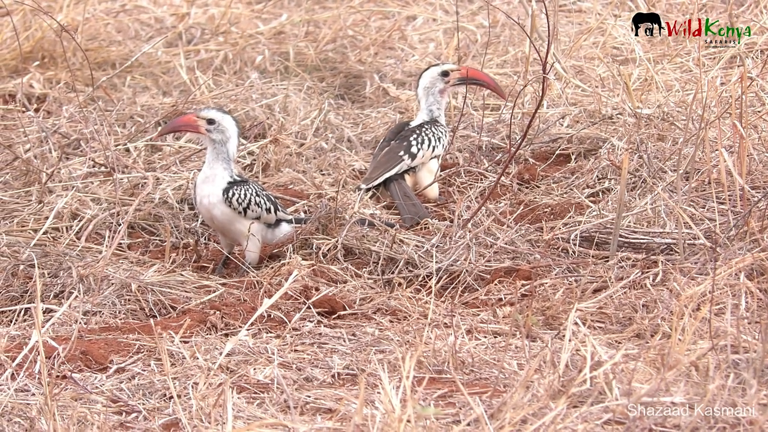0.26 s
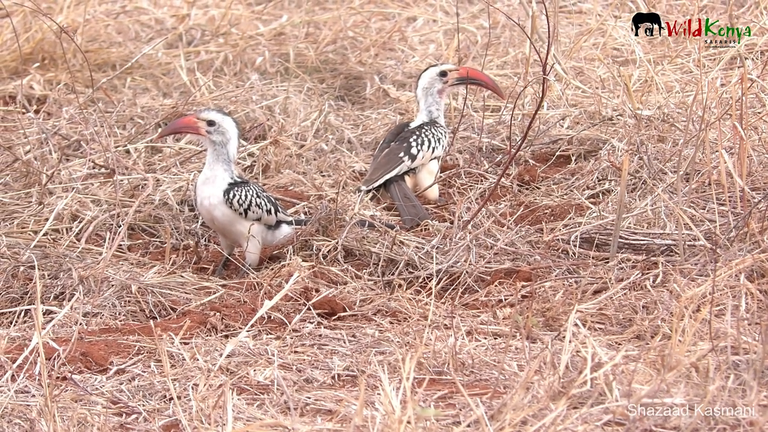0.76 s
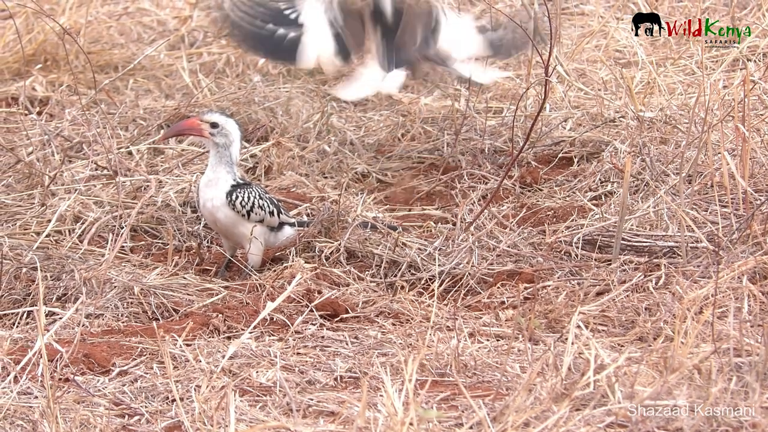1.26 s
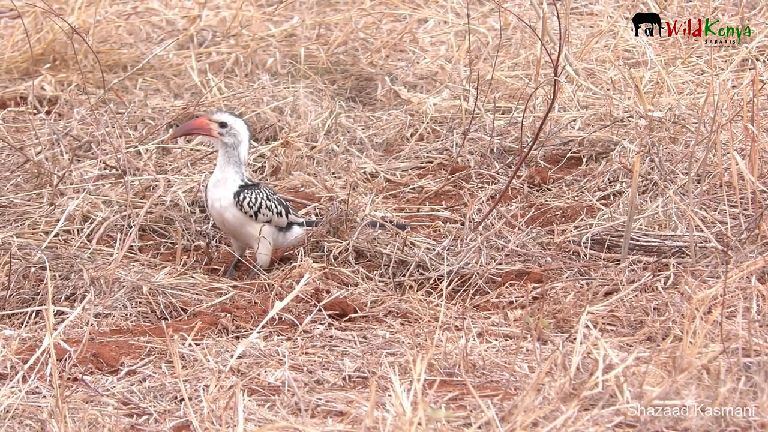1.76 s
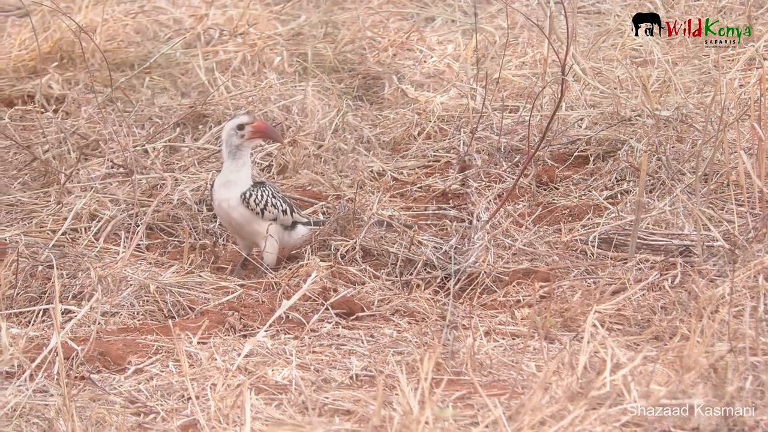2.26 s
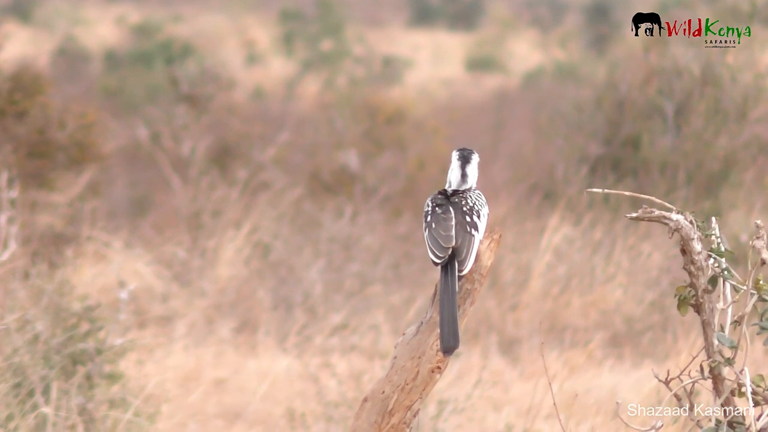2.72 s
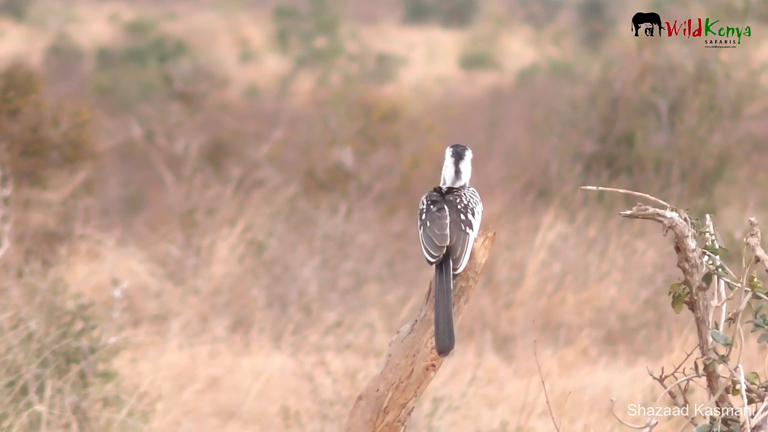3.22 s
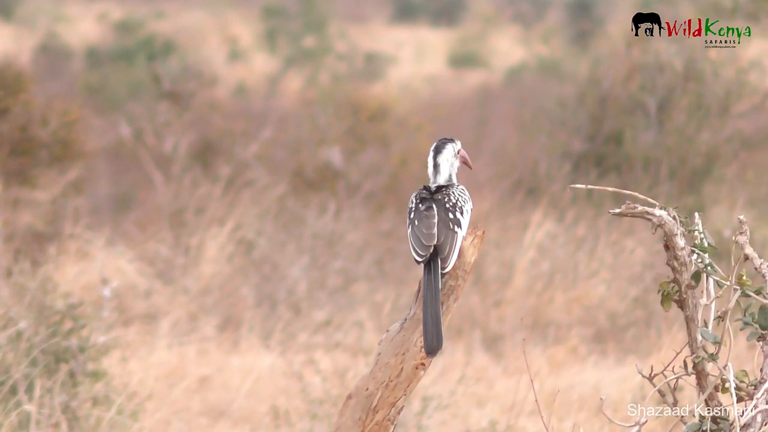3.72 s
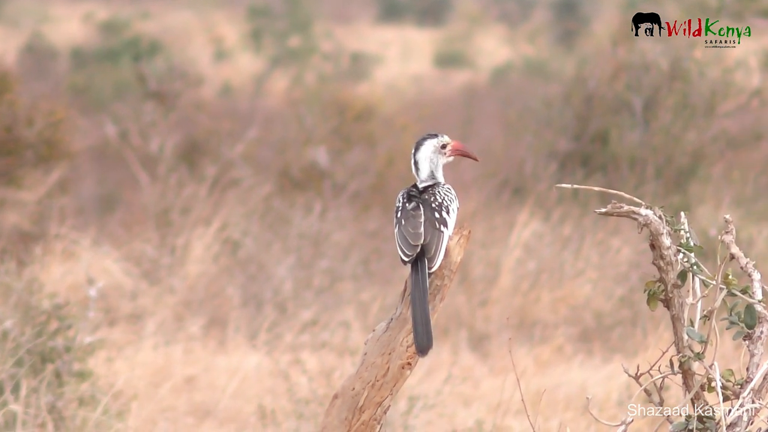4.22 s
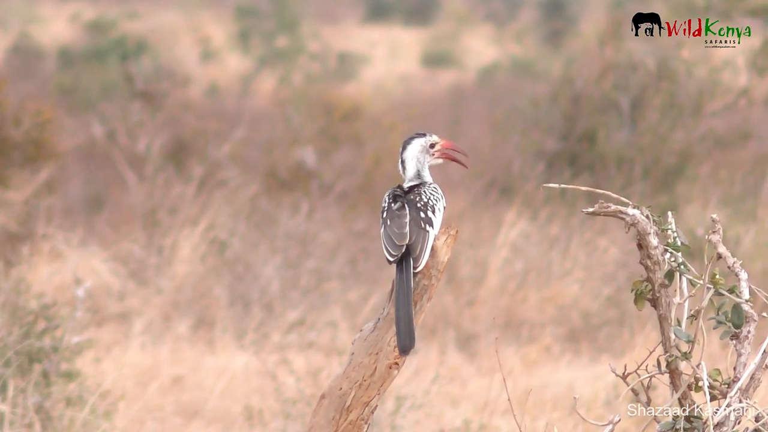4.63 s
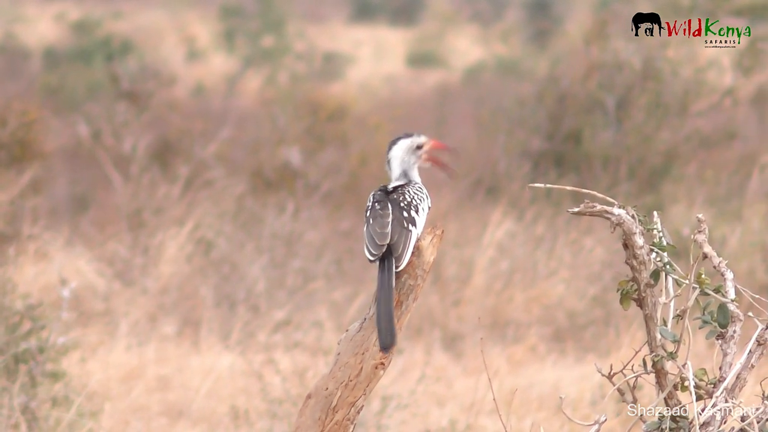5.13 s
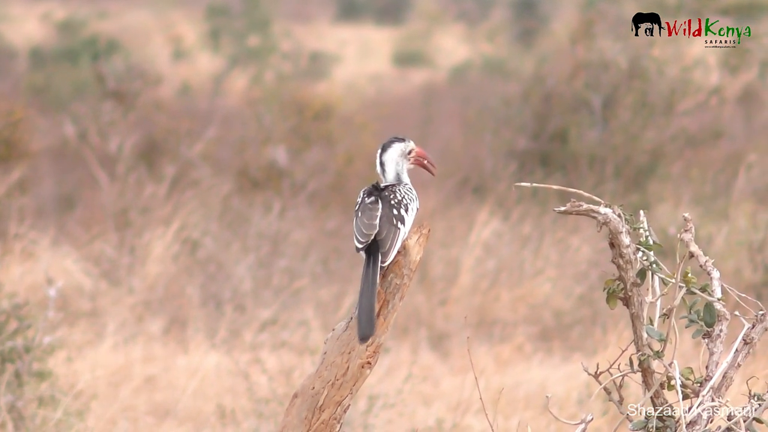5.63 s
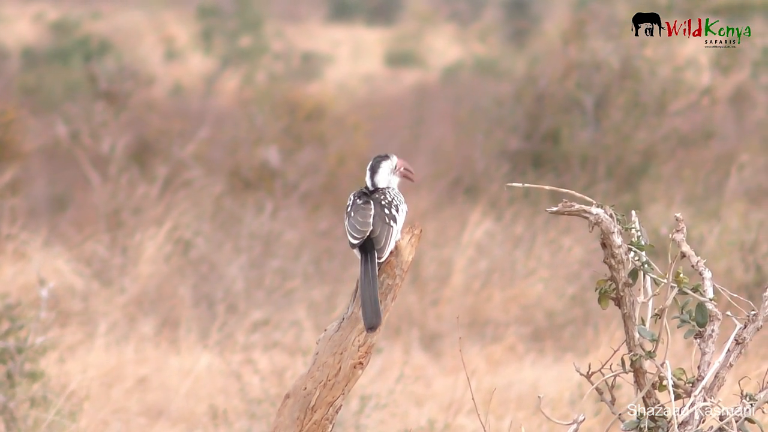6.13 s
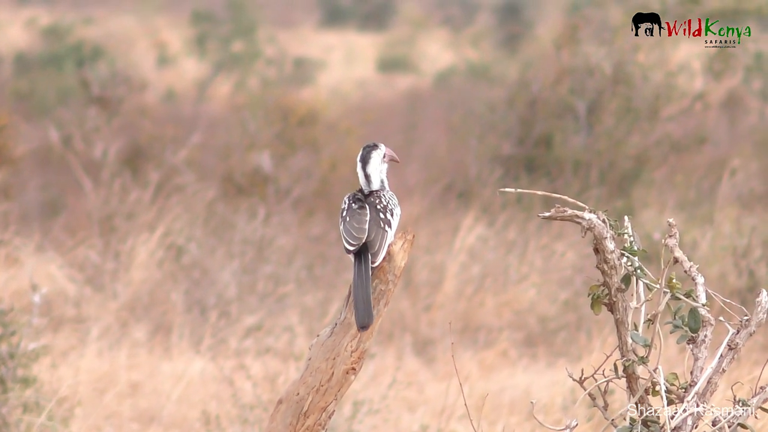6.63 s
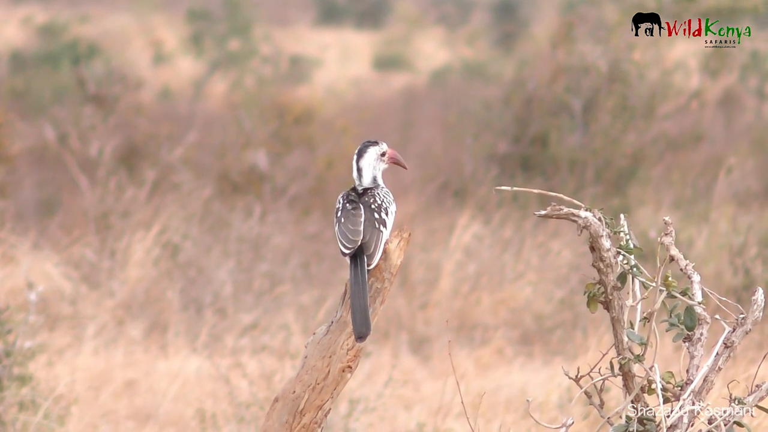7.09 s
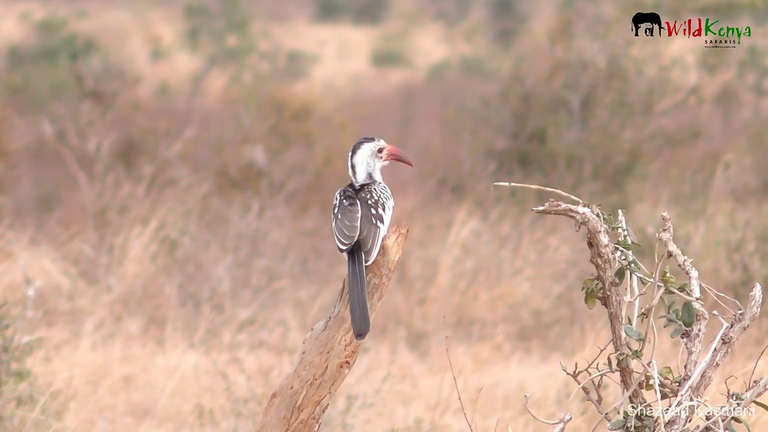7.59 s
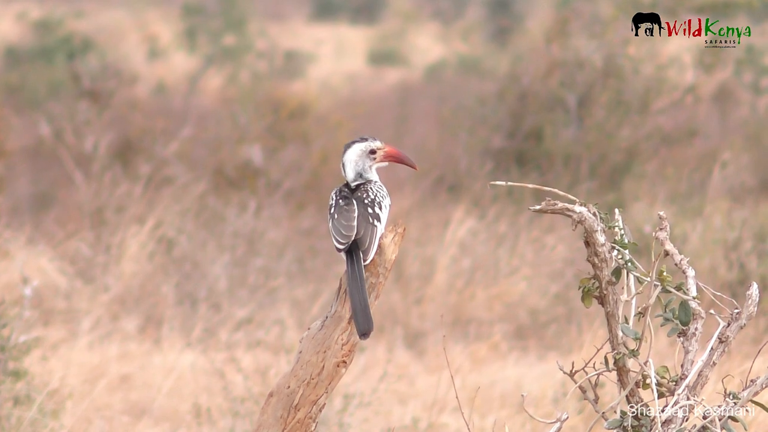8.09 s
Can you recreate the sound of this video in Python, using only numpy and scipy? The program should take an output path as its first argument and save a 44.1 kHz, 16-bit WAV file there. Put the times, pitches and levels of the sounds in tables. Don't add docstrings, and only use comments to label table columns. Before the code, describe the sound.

A nearby bird's rapid squawking, trilled and whistled chatter breaks off abruptly in windy dry bush; faint far birds chirp on over low rumble.

```python
import sys
import numpy as np
from scipy import signal
from scipy.fft import rfft, irfft, next_fast_len
from scipy.io import wavfile
from scipy.ndimage import uniform_filter1d

SR = 44100
rng = np.random.default_rng(int(sys.argv[2]) if len(sys.argv) > 2 else 0)


def waveform_to_disk(signal):
    frames = np.transpose(np.atleast_2d(signal))
    scaled = np.clip(frames, -1, 1) * 32767
    samples = np.round(scaled).astype(np.int16)
    wavfile.write(sys.argv[1], SR, samples)


def linear_from_db(decibels):
    return 10 ** (np.asarray(decibels, float) / 20)


N = 368468

WHISTLE_OVERTONES_DB = -16


def along(table, column, t):
    rows = np.array(table)
    return np.interp(t, rows[:, 0], rows[:, column])


def walk(rate, size=N):
    k = int(SR / rate)
    w = np.repeat(rng.standard_normal(size // k + 1), k)
    w = uniform_filter1d(uniform_filter1d(w, k), k)[:size]
    return w / w.std()


def band(shape, lo_hz, hi_hz):
    size = next_fast_len(N)
    points = np.array(shape)
    octave = np.log2(np.fft.rfftfreq(size, 1 / SR) + 1)
    edge = np.clip(np.minimum(octave - np.log2(lo_hz), np.log2(hi_hz) - octave) + .5, 0, 1)
    colour = linear_from_db(np.interp(octave, np.log2(points[:, 0]), points[:, 1]))
    return irfft(rfft(rng.standard_normal(size)) * colour * np.sin(edge * np.pi / 2), size)[:N]


def add(out, start_s, sound, fade_s):
    i, k = int(start_s * SR), np.arange(len(sound))
    rounded = np.clip(np.minimum(k, k[::-1]) / (fade_s * SR), 0, 1)
    out[i:i + len(sound)] += sound * np.sin(np.pi / 2 * rounded) ** 2


def scrub(x, t60_s, wet_db, wide):
    t = np.arange(SR // 2) / SR
    mid, side = rng.standard_normal((2, len(t))) * linear_from_db(-60 * t / t60_s) * (t > .004)
    gain = linear_from_db(wet_db) / np.sqrt(np.sum(mid ** 2))
    return x + gain * np.array([signal.fftconvolve(x, mid + s * wide * side)[:N] for s in (1, -1)])


def wind():
    # (time [s], level [dB])
    gust = [(0, -8), (.3, -9), (.9, -9), (1.5, -12.5), (2.6, -14.5), (3.25, -18.5), (3.55, -15.5),
            (4.5, -15), (5.2, -20), (5.9, -18), (6.45, -22.5), (6.8, -15.5), (7.5, -16.5), (7.8, -16.5),
            (8.36, -15)]
    # (frequency [Hz], level per Hz [dB])
    rumble = [(5.9, -43), (10, 9), (22, 1.5), (34, -0.5), (84, -17), (303, -49), (800, -68.5),
              (1040, -67.5), (1760, -120)]
    # (time [s], extra level in the upper rumble [dB])
    buffets = [
        (0.534, 12),
        (0.902, 11.5),
        (2.551, 8.5),
        (3.549, 4.5),
        (3.862, 6.5),
        (5.8, 9.5),
        (5.957, 11),
        (7.689, 7),
        (7.791, 15.5),
    ]
    t, burst, out = np.arange(N) / SR, walk(8.1), 0
    buffet_db = sum(db * np.exp(-((t - s) / 0.039) ** 2) for s, db in buffets)
    for k, hz in enumerate(8 * 2. ** np.arange(7)):
        eddy = band(rumble, hz, 2 * hz)
        steady = eddy * (eddy.var() / uniform_filter1d(eddy ** 2, size=12000)) ** .5
        smallness = min(k / 3, 1)
        burst_db = 0.57 * burst + 2.0 * walk(24) + buffet_db
        out = out + steady * linear_from_db(smallness * burst_db + 0.16 * buffet_db)
    out *= linear_from_db(along(gust, 1, t)) / out.std()
    return out + linear_from_db(-46.5) * np.roll(out, shift=5000) * np.array([[1], [-1]])


def hiss():
    # (time [s], level [dB])
    swell = [(0, -59.5), (.1, -58.5), (.5, -57.5), (.75, -61), (1.5, -63), (5.0, -66), (6.1, -68),
             (6.6, -66.5), (7.2, -64.5), (8.3, -62), (8.36, -53)]
    # (frequency [Hz], level per Hz [dB])
    air = [(150, 11.5), (400, 5), (1300, -8), (3000, -14.5), (7500, -22), (11000, -22.5), (15500, -27.5)]
    mid, side = band(air, 189, 20000), band(air, 4340, 20000)
    level = linear_from_db(along(swell, 1, np.arange(N) / SR) + 15.0 + 1.0 * walk(5.3)) / mid.std()
    return level * (mid + (1.2 * side + 0.033 * band(air, 200, 1500)) * np.array([[1], [-1]]))


def far_birds():
    # (time [s], length [s], start [Hz], end [Hz], level [dB])
    strokes = [(.083, 0.012, 3820, 2500, -54), (.118, 0.04, 3100, 4250, -56.5),
               (.158, 0.049, 4100, 3020, -57.5), (5.097, 0.16, 3160, 3840, -70),
               (5.125, 0.13, 2290, 2470, -66.5), (5.39, 0.0084, 3520, 2750, -62.5),
               (5.4, .02, 3600, 3850, -65.5), (5.79, .015, 2810, 2620, -61), (5.827, .016, 2950, 2800, -60),
               (5.99, .012, 3000, 3600, -67.5), (5.585, 0.018, 4350, 4150, -67),
               (6.538, .012, 3800, 3050, -61), (6.553, 0.011, 4100, 3000, -52.5),
               (6.58, 0.016, 3370, 2980, -57), (6.605, 0.045, 2250, 2000, -62.5),
               (6.648, 0.028, 3850, 3200, -56), (6.69, 0.051, 3480, 3560, -64),
               (6.94, 0.012, 2410, 3500, -50.5), (7.183, .004, 2020, 3470, -48),
               (7.18, .25, 1180, 2170, -71), (7.251, 0.096, 2980, 3560, -68.5),
               (7.45, 0.014, 1000, 1390, -54), (7.7, .012, 3980, 4450, -57.5),
               (7.575, .004, 3300, 3240, -58), (7.395, 0.0085, 3070, 3680, -60),
               (7.742, .004, 3800, 2500, -51), (7.895, 0.0043, 1990, 3600, -51),
               (8.24, .1, 1900, 2090, -71), (8.24, .1, 2930, 3080, -82)]
    # (time [s], length [s], start [Hz], end [Hz], level [dB])
    arches = [(5.027, 0.048, 2544, 2600, -59), (5.487, 0.049, 2790, 2740, -54.5),
              (5.555, 0.048, 2880, 2270, -58.5), (5.715, 0.053, 2660, 2490, -53.5),
              (6.232, 0.049, 2790, 2790, -50.5), (6.34, 0.018, 2596, 2416, -47.5),
              (6.456, 0.029, 2510, 2750, -49.5), (6.505, 0.01, 2750, 2360, -46),
              (6.757, 0.036, 2620, 2500, -47), (6.957, 0.052, 2734, 2800, -49),
              (7.05, 0.022, 2686, 2460, -42.5), (7.19, 0.02, 2610, 2700, -47),
              (7.227, 0.01, 2726, 2210, -43), (7.471, 0.024, 2600, 2850, -49.5),
              (7.672, 0.027, 2780, 2800, -47), (7.759, 0.031, 2630, 2360, -53),
              (7.903, 0.018, 2605, 2730, -50.5), (7.937, 0.013, 2690, 2370, -46)]
    # (time [s], length [s], level [dB])
    pipings = [
        (5.29, 0.089, -57.5),
        (5.862, 0.011, -60),
        (5.895, 0.016, -63),
        (5.935, .004, -61.5),
        (6.013, 0.045, -56),
        (6.066, .06, -63.5),
        (6.757, 0.05, -55.5),
        (7.417, 0.079, -57),
    ]
    # (time [s], length [s], start [Hz], end [Hz], level [dB])
    flicks = [(6.215, 0.0064, 2180, 2890, -58.5), (6.314, 0.0014, 2940, 2150, -52),
              (6.326, 0.0011, 2820, 2140, -48), (6.455, .002, 2110, 3400, -54),
              (6.494, 0.0022, 4300, 2420, -56), (7.0, 0.0022, 2730, 1970, -53),
              (7.034, 0.0021, 2860, 2200, -51.5), (7.22, 0.00066, 3270, 2230, -66),
              (7.468, 0.00082, 2340, 3420, -65), (7.932, .001, 3390, 2360, -56.5),
              (7.538, 0.0032, 3054, 2560, -55), (8.12, .06, 2600, 2500, -67.5)]
    piping_hz, piping_sag_hz = 3020, 80
    piped = [(s, length, piping_hz, piping_hz - piping_sag_hz, db) for s, length, db in pipings]
    # (notes, rise of the middle [Hz], scoop share, overtone [dB])
    birds = ((arches, 30, .36, -20), (piped, 0, .1, -26), (strokes, 0, 0, -26), (flicks, 0, 0, -12))
    out = np.zeros(N)
    flutter = 1 + .012 * walk(200)
    for rows, arch_hz, scoop, overtone_db in birds:
        for s, length, start_hz, end_hz, db in rows:
            u = np.linspace(0, 1, int((length + 0.0142) * SR))
            hz = start_hz + (end_hz - start_hz) * u + arch_hz * np.sin(np.pi * u)
            edge_s = np.minimum(u, 1 - u) * len(u) / SR
            scooped = (u > .5) | (end_hz > start_hz - 200)
            hz = hz * (1 - scoop * scooped * np.exp(-edge_s / 0.0024)) * flutter[:len(u)]
            phase = 2 * np.pi * np.cumsum(hz) / SR
            whistle = np.sin(phase) + linear_from_db(overtone_db) * np.sin(2 * phase)
            add(out, s - .008, np.sqrt(2) * linear_from_db(db) * whistle, .005)
    return scrub(out * linear_from_db(2.3 * walk(90)), 0.16, -8.5, 0.085)


def throat_db(hz, turned_away):
    # (frequency [Hz], gain [dB])
    throat = [(800, -14), (1250, -11.5), (2400, -3.5), (4400, -0.5), (5600, 2), (6600, -12), (7500, -12),
              (15000, -31)]
    points = np.array(throat)
    front_db = np.interp(np.log(hz), np.log(points[:, 0]), points[:, 1])
    away_hz, away_db_per_octave = 2500, -19.5
    return front_db + turned_away * away_db_per_octave * np.log2(np.maximum(hz / away_hz, 1))


def notes():
    # (time [s], pitch [Hz])
    fall = [
        (0.833, 2970),
        (0.84, 2946),
        (0.844, 2188),
        (0.851, 2500),
        (0.862, 1777),
        (0.88, 1700),
        (.893, 1326),
        (0.914, 1067),
        (0.936, 1116),
        (0.946, 890),
    ]
    # (delay [s], level [dB])
    fall_repeats = [
        (0, -16.5),
        (1.631, -21),
        (2.794, -21),
        (6.747, -22),
    ]
    # (time [s], pitch [Hz])
    early = [
        [(1.292, 900), (1.308, 1893), (1.324, 1904)],
        [(1.39, 1178), (1.405, 2050), (1.42, 1300), (1.443, 984)],
        [(1.561, 2940), (1.566, 3210), (1.575, 2617), (1.586, 2003), (1.6, 1280)],
        [(1.604, 1173), (1.618, 1175), (1.631, 1363), (1.637, 1838), (1.648, 2226), (1.657, 1540),
         (1.668, 1400), (1.681, 1150), (1.691, 850)],
        [(1.785, 1636), (1.8, 1960), (1.835, 1700), (1.859, 2650), (1.867, 3900), (1.874, 2900), (1.886, 2500),
         (1.92, 2357)],
        [(2.008, 4540), (2.012, 6500), (2.018, 6900), (2.031, 6900), (2.043, 4500), (2.06, 2484), (2.11, 1060)],
        [(2.173, 5150), (2.185, 1729), (2.2, 1223), (2.26, 1550), (2.3, 1095), (2.345, 1505), (2.365, 869)],
        [(2.415, 2556), (2.445, 2660), (2.456, 2238), (2.462, 3077), (2.485, 2470)],
        [(2.536, 2224), (2.545, 2237), (2.553, 4110), (2.56, 4520)],
        [(2.59, 1880), (2.598, 4184), (2.604, 4160), (2.62, 2260), (2.645, 1550), (2.668, 1070)],
        [(2.733, 3970), (2.75, 1700), (2.785, 1854), (2.797, 2188), (2.815, 2535), (2.83, 2635), (2.843, 2310),
         (2.85, 1907), (2.878, 2170)],
        [(2.987, 1066), (3.0, 1298), (3.015, 1426), (3.03, 1583), (3.045, 1260)],
        [(3.05, 3860), (3.068, 4250), (3.09, 4260)],
    ]
    # (level [dB], overtones [dB])
    early_effort = [(-28.5, -5), (-24, -4.5), (-24.5, 3), (-26, 7), (-26.5, -6.5), (-28, -16.5),
                    (-24.5, -2), (-24.5, -4.5), (-23, 0.5), (-24, -12.5), (-26, -4), (-26.5, -0.5),
                    (-26.5, -12)]
    # (time [s], pitch [Hz])
    late = [
        [(3.11, 1087), (3.118, 2606), (3.13, 2630)],
        [(3.184, 5370), (3.192, 4390), (3.2, 3730), (3.207, 2824), (3.215, 2478), (3.227, 2606)],
        [(3.225, 3700), (3.246, 3650), (3.253, 3127), (3.26, 1967), (3.285, 830)],
        [(3.352, 4140), (3.362, 3237), (3.378, 2540), (3.42, 3203), (3.45, 3626), (3.485, 3210), (3.497, 1930),
         (3.505, 1700)],
        [(3.53, 1402), (3.545, 2890), (3.56, 3160), (3.568, 1311), (3.6, 830)],
        [(3.63, 2180), (3.666, 2320), (3.678, 1105), (3.69, 1147), (3.698, 2220), (3.715, 2343), (3.72, 2500)],
        [(3.81, 1740), (3.822, 3885), (3.845, 2220), (3.89, 823)],
        [(3.983, 4240), (3.99, 3220), (4.0, 3046), (4.007, 2160)],
        [(4.014, 2723), (4.04, 1975), (4.05, 3114), (4.058, 1241), (4.08, 2415), (4.1, 3220), (4.13, 1537),
         (4.16, 970)],
        [(4.285, 1003), (4.305, 1310), (4.318, 1484), (4.328, 3450)],
        [(4.367, 3620), (4.38, 1615), (4.39, 1417), (4.41, 2410)],
        [(4.47, 5340), (4.505, 2435), (4.525, 2730), (4.548, 2484), (4.58, 758)],
        [(4.669, 3980), (4.68, 2906), (4.695, 2120), (4.725, 2260), (4.734, 2864), (4.745, 2785), (4.755, 3100),
         (4.79, 2810), (4.82, 2180)],
        [(4.856, 1407), (4.878, 3010), (4.89, 1204), (4.92, 884)],
    ]
    # (level [dB], overtones [dB])
    late_effort = [(-27.5, -13), (-29, -1), (-29, -11), (-26, -2.5), (-27.5, 0), (-32, 3), (-26.5, -6.5),
                   (-26.5, -9), (-28.5, -2), (-24.5, -3.5), (-27.5, -0.5), (-30.5, 0.5), (-24, -7),
                   (-28.5, -0.5)]
    # (time [s], length [s], start [Hz], end [Hz], level [dB])
    slides = [
        (1.346, .016, 1700, 797, -27.5),
        (1.45, 0.039, 1870, 885, -28.5),
        (3.043, 0.009, 1240, 4870, -43),
        (1.958, 0.02, 5630, 1474, -28.5),
        (2.885, 0.043, 882, 1823, -27),
        (2.932, 0.025, 1272, 827, -26.5),
        (2.96, 0.021, 1680, 1650, -34),
        (3.056, 0.02, 3785, 1800, -30),
        (3.088, 0.0095, 3800, 1405, -25),
        (3.735, 0.014, 5500, 2030, -29),
    ]
    # (time [s], length [s], start [Hz], end [Hz], level [dB])
    whistles = [(1.918, 0.023, 6950, 6800, -30.5), (2.502, 0.007, 6370, 6900, -13),
                (2.555, 0.014, 7000, 6260, -11.5), (2.574, 0.011, 6420, 6540, -15),
                (3.512, 0.017, 1750, 1940, -27), (3.13, 0.0056, 6850, 6960, -16.5),
                (2.5, 0.023, 6920, 7220, -31), (3.161, 0.0041, 6700, 6990, -15.5),
                (3.17, 0.019, 6770, 6800, -22), (3.754, 0.0051, 5900, 6600, -18),
                (3.787, 0.023, 7100, 6920, -19.5), (2.752, 0.033, 2776, 2960, -31),
                (3.103, .007, 2940, 2770, -29), (4.226, 0.053, 2900, 2500, -44),
                (4.333, 0.0179, 3830, 4230, -24), (4.415, 0.0071, 7100, 6900, -27),
                (4.433, 0.0084, 6950, 7100, -28), (4.45, 0.014, 6830, 6820, -22.5),
                (4.47, 0.0082, 6760, 6900, -25.5), (4.522, 0.026, 3590, 3470, -33.5),
                (3.07, 0.016, 6910, 6530, -26), (3.325, 0.033, 5100, 5500, -54),
                (4.64, 0.053, 4700, 5500, -45), (1.4, 0.029, 2400, 3400, -31),
                (4.731, 0.014, 3300, 2300, -26), (3.003, 0.046, 4200, 4550, -26),
                (3.214, .012, 2600, 2800, -23.5), (4.1, 0.007, 5200, 5050, -45),
                (1.66, 0.0082, 2900, 3200, -42)]
    turns_s = 1.5
    found = []
    for path, (db, over_db) in zip(early + late, early_effort + late_effort):
        found.append((path, db, over_db, path[0][0] < turns_s, 0))
    for rows, over_db in ((slides, -3.5), (whistles, WHISTLE_OVERTONES_DB)):
        for s, length, start_hz, end_hz, db in rows:
            found.append(([(s, start_hz), (s + length, end_hz)], db, over_db, s < turns_s, 0))
    for delay_s, db in fall_repeats:
        found.append(([(s + delay_s, hz) for s, hz in fall], db, -8.5, 1.2, 1))
    return found


def rattle():
    # (time [s], pitch [Hz], level [dB])
    climb = [
        (0.95, 434, -53),
        (1.101, 424, -51),
        (1.198, 450.6, -44.5),
        (1.268, 473, -40),
        (1.3, 495, -46.5),
    ]
    # (frequency [Hz], width [Hz], level [dB])
    resonances = [
        (830, 870, 2.5),
        (2180, 1180, 3),
        (4280, 1900, -6.5),
    ]
    t, out = np.arange(climb[0][0], climb[-1][0], 1 / SR), np.zeros(N)
    pitch = along(climb, 1, t)
    hz = pitch * (1 + .055 * walk(350, size=len(t)))
    phase = 2 * np.pi * np.cumsum(hz) / SR
    opening = pitch / climb[0][1]
    odd_db = -9 * np.linspace(0, 1, len(t)) ** 2
    voice = 0
    for k in range(2, 13):
        throat = sum(linear_from_db(db) / (1 + (2 * (k * hz - f * opening ** n) / width) ** 2)
                     for n, (f, width, db) in zip((1, 2, 1), resonances))
        flicker = linear_from_db(2.5 * walk(26.9, size=len(t)))
        voice = voice + throat * linear_from_db(odd_db * (k % 2)) * np.sin(k * phase) * flicker
    chop_hz = 80 * np.exp(0.08 * walk(41.2, size=len(t)))
    bursts = 1 + 0.75 * np.sin(2 * np.pi * np.cumsum(chop_hz) / SR)
    add(out, t[0], linear_from_db(along(climb, 2, t)) * voice * bursts, .01)
    return out


def near_bird():
    # (start [s], end [s], waver [Hz], pitch swing [0-1], harsh air [dB])
    trills = [
        (1.562, 1.607, 115.1, 0.12, -31),
        (1.6, 1.691, 113, 0, -27.5),
        (2.19, 2.297, 140.4, 0.075, -42),
        (2.752, 2.869, 80, 0.07, -30),
        (3.365, 3.491, 78.7, 0.14, -37),
        (3.989, 4.169, 120.5, 0.01, -21.5),
        (4.686, 4.734, 91.4, 0.1, -29),
        (4.743, 4.818, 73.1, 0.11, -38.5),
    ]
    # (start [s], end [s], loss of overtones [dB])
    pure = [(1.3, 1.333, -17), (3.176, 3.21, -23), (3.219, 3.297, -1), (3.441, 3.522, -22),
            (3.53, 3.564, -25.5), (3.816, 3.811, -12), (3.822, 3.832, -12), (4.324, 4.339, -10.5),
            (4.36, 4.37, -21.5), (4.395, 4.42, -7), (4.465, 4.5, -18), (4.514, 4.59, -17.5),
            (4.77, 4.839, -20.5), (4.85, 4.886, -22.5), (2.724, 2.724, -18), (2.6, 2.615, -9)]
    t, out = np.arange(N) / SR, np.zeros(N)
    swing, throb = .017 * walk(400), linear_from_db(1.04 * walk(90))
    harsh = np.full(N, linear_from_db(-43.5))
    for t0, t1, flap_hz, depth, harsh_db in trills:
        on = (t > t0) & (t < t1)
        flap = 2 * np.pi * np.cumsum(flap_hz * np.exp(.12 * walk(45)[on])) / SR
        swing[on] += depth * np.sin(flap) * np.exp(.15 * walk(50)[on])
        throb[on] *= 1 + min(7 * depth, .85) * np.cos(flap - 2.2)
        harsh[on] = linear_from_db(harsh_db + np.linspace(4, -6, on.sum()))
    harsh = uniform_filter1d(harsh, size=500)
    thin_db = uniform_filter1d(sum(db * ((t > t0) & (t < t1)) for t0, t1, db in pure), size=250)
    patchy_db = 3.5 * (np.tanh(walk(90)) - .5)
    throb *= 1 + linear_from_db(-12.5) * walk(1500)
    harsh *= band([(6000, 10), (9500, -3), (12000, -7), (15500, -6)], 3900, 20000) * linear_from_db(2.5 * walk(40))
    quaver_hz = 85
    for path, db, over_db, turned_away, small in notes():
        at = slice(int((path[0][0] - .004) * SR), int((path[-1][0] + 0.0061) * SR))
        pitch = uniform_filter1d(2 ** along(np.log2(path), 1, np.log2(t[at])), size=120)

        def body_db(f, k):
            flicker_db = np.take(patchy_db, at.start + 9001 * k + np.arange(len(f)), mode="wrap")
            return throat_db(f, turned_away) + flicker_db + small * 14.5 * np.log2(np.minimum(f / 1700, 1))

        quaver = 2 * np.pi * quaver_hz * (t[at] - path[0][0])
        looseness = 1 + small if over_db > WHISTLE_OVERTONES_DB else .3
        hz = pitch * (1 + swing[at] * looseness + small * .033 * np.sin(quaver))
        phase = 2 * np.pi * np.cumsum(hz) / SR
        rich_db = over_db + thin_db[at] - 5 * np.log2(np.maximum(pitch / 2200, 1))
        rich_db -= small * 12 * np.log2(np.maximum(pitch / 1400, 1))
        octaves_per_s = np.abs(np.gradient(np.log2(pitch))) * SR
        glide_db = 0.5 * np.tanh(octaves_per_s / 70)
        chop = 1 + small * .4 * np.sin(quaver + 0.6)
        voice = linear_from_db(body_db(pitch, 1)) * np.sin(phase) + harsh[at] * linear_from_db(6.5 - 8.3 * turned_away)
        step_db = np.minimum(-7.5 + 0.37 * over_db, 0)
        for k in range(2, 13):
            gain = linear_from_db(rich_db + step_db * (k - 2) + body_db(k * hz, k)) * (k * hz < .4 * SR)
            voice += gain * np.sin(k * phase)
        tiring_db = -2 - 1.9 * turned_away * (1 - small / 2)
        effort = linear_from_db(db + tiring_db * np.linspace(-.5, .5, len(hz)))
        add(out, t[at][0], np.sqrt(2) * effort * linear_from_db(glide_db) * chop * voice * throb[at], .009)
    return scrub(out + rattle(), .17, -9, .09)


def fly():
    # (time [s], wing beat [Hz], level [dB])
    passes = [
        [(4.5, 181.6, -63), (4.62, 174, -56.5), (4.68, 191, -51.5), (4.8, 171, -60)],
        [(5.45, 179, -60.5), (5.58, 190.5, -55.5), (5.75, 167.4, -61)],
    ]
    out = np.zeros(N)
    for path in passes:
        t = np.arange(path[0][0], path[-1][0], 1 / SR)
        phase = 2 * np.pi * np.cumsum(along(path, 1, t)) / SR
        drone = sum(np.sin(k * phase) for k in (3, 4, 5))
        add(out, t[0], linear_from_db(along(path, 2, t)) * drone, .03)
    return out


def scene():
    return wind() + hiss() + far_birds() + near_bird() + fly()


def low_pass(x):
    return signal.sosfilt(signal.butter(12, 15780, fs=SR, output="sos"), x)


def record(dry):
    step = 0
    for s, height, relax_s in ((2.4142, 0.33 / 2, 0.005), (0.8, .012, .0004)):
        t = np.arange(N) / SR - s
        step = step + height * np.sign(t) * np.exp(-np.abs(t) / relax_s)
    fade_out = np.minimum((N - np.arange(N)) / 400, 1)
    return low_pass(np.clip(dry + step, -1, 1) * fade_out)


dry = scene()
out = record(dry)
waveform_to_disk(out)
```